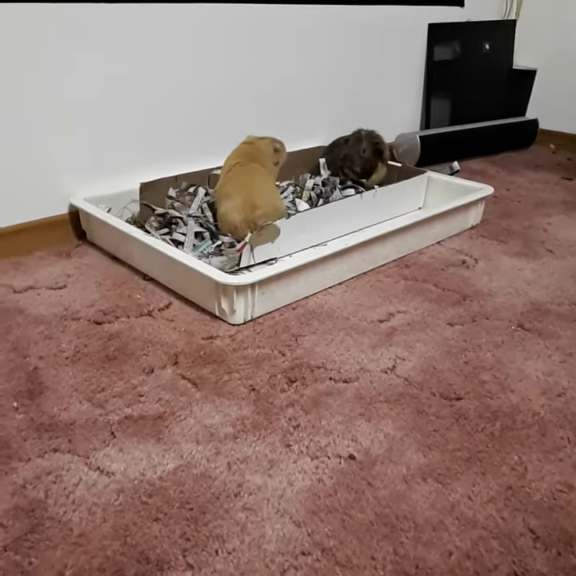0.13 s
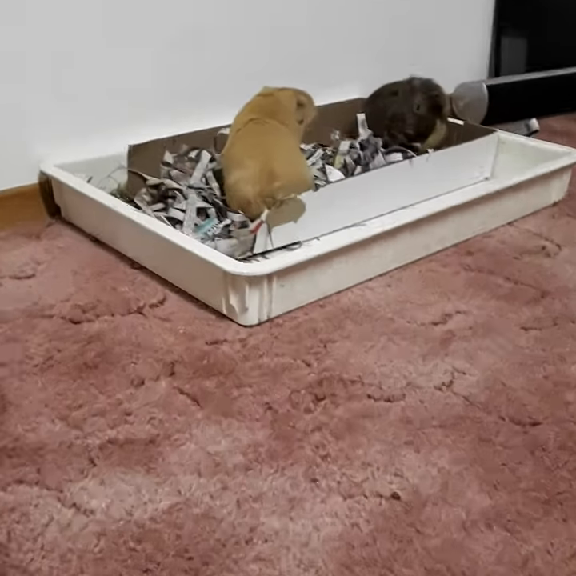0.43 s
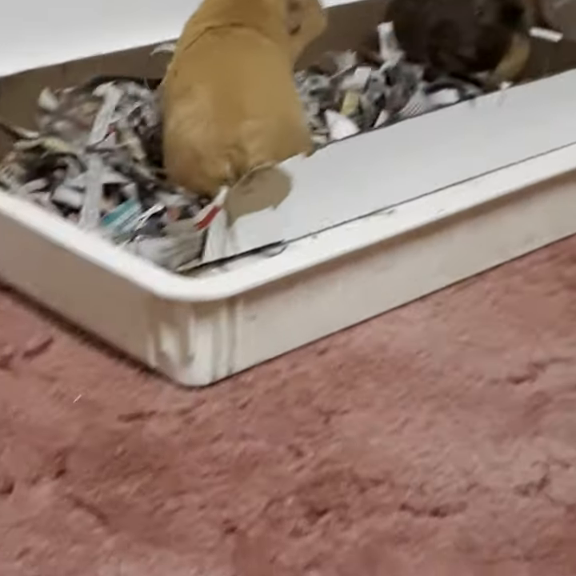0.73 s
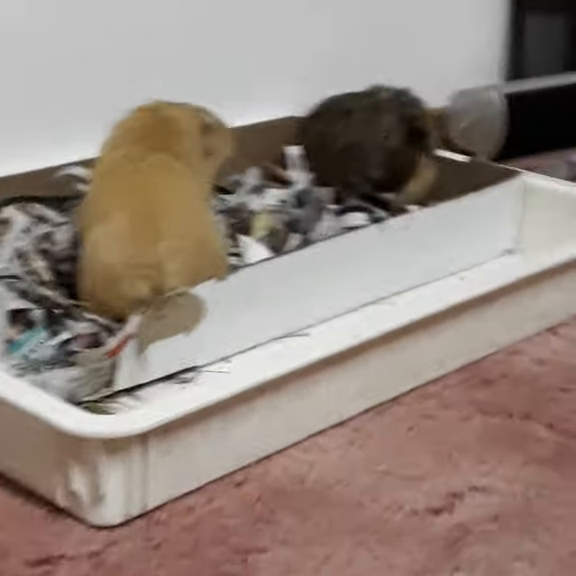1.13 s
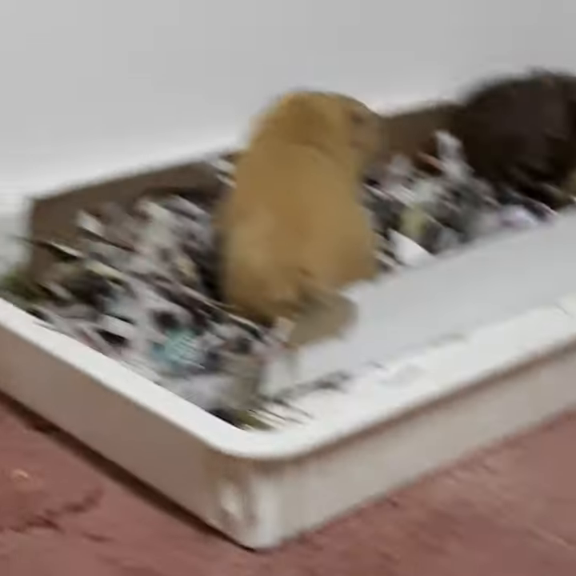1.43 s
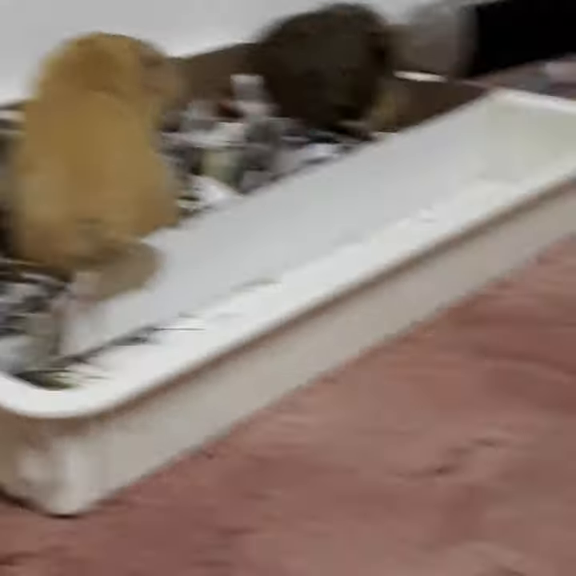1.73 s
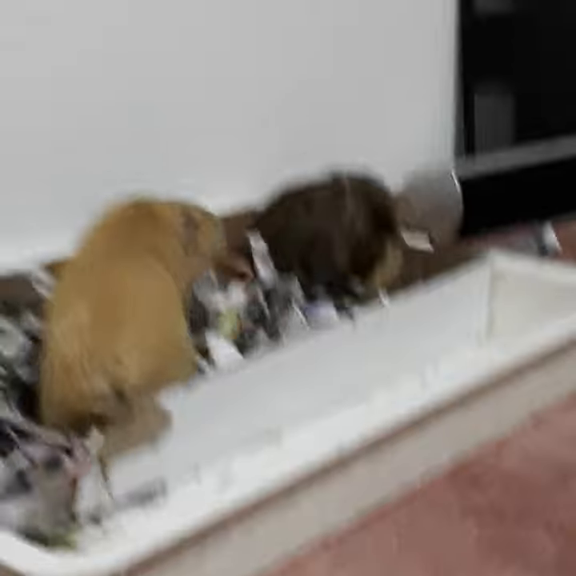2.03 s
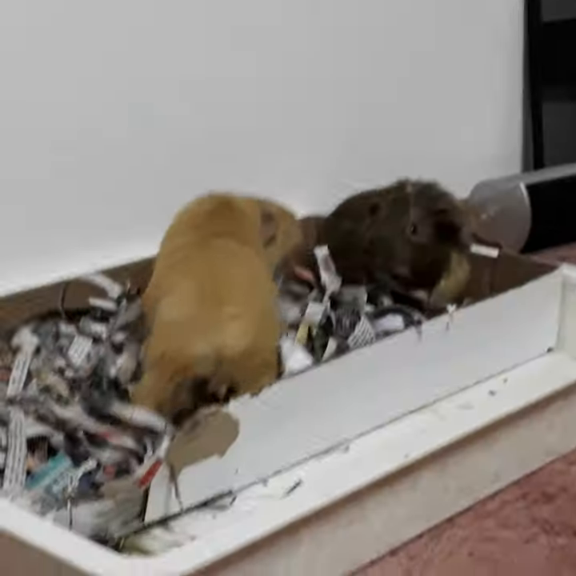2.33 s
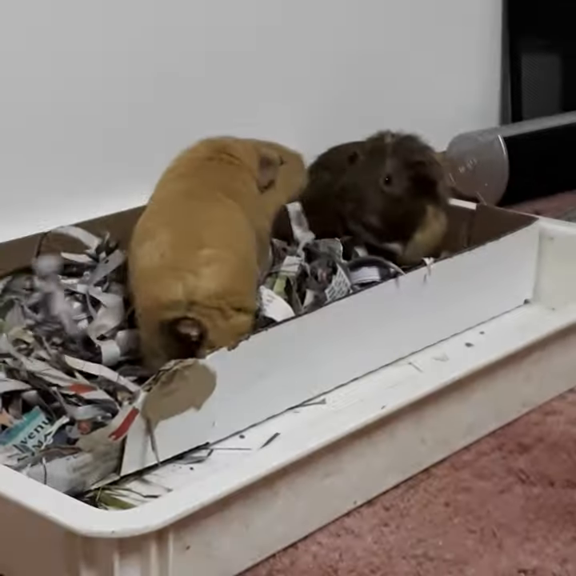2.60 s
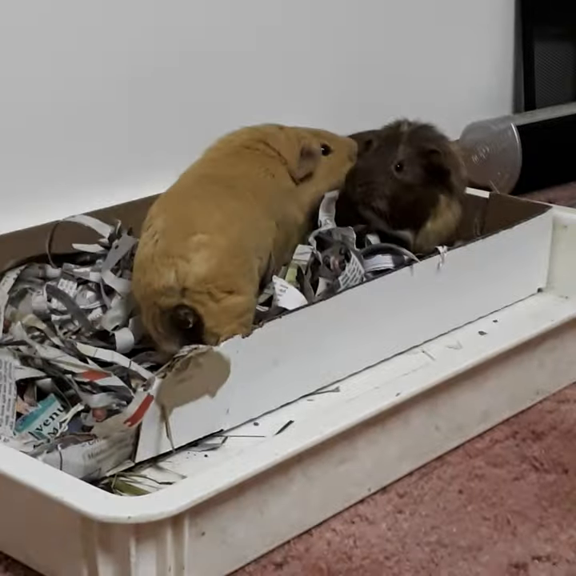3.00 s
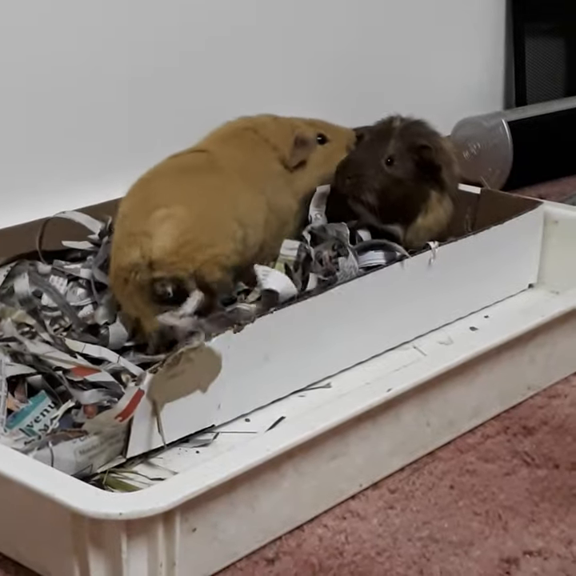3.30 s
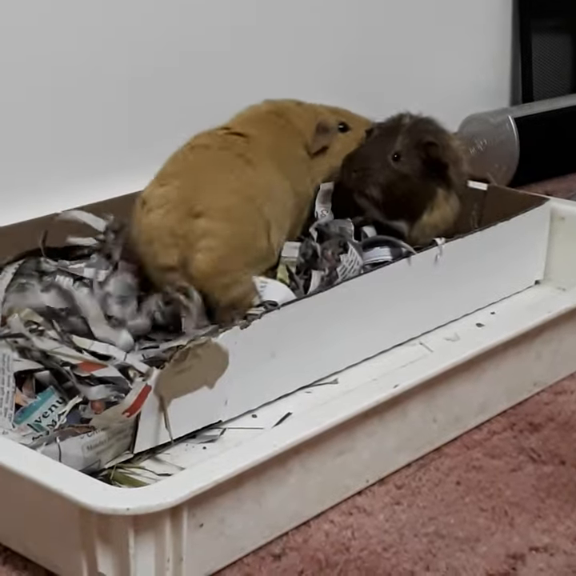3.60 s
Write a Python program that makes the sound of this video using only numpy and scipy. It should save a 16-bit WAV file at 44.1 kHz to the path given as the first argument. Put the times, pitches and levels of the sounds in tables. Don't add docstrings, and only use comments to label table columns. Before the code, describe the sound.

Guinea pig teeth clicks and low throaty chuts with brief squeaks over crackling paper litter

```python
import sys
import numpy as np
from scipy import signal
from scipy.fft import rfft, irfft, next_fast_len
from scipy.io import wavfile
from scipy.ndimage import uniform_filter1d, map_coordinates

SR = 44100
rng = np.random.default_rng(int(sys.argv[2]) if len(sys.argv) > 2 else 0)


def boost_factor(decibels):
    exponent = np.asarray(decibels, float) / 20
    return 10 ** exponent


def digitize_waveform(pressure):
    field = np.atleast_2d(pressure).T
    bounded = np.clip(field, -1, 1)
    quanta = np.round(bounded * 32767).astype(np.int16)
    wavfile.write(sys.argv[1], SR, quanta)


N = 165375


def unit(x):
    return x / np.sqrt(np.mean(x ** 2) + 1e-20)


def along(points, hz):
    f, v = np.transpose(points)
    return np.interp(np.log(hz + 1), np.log(f + 1), v)


def wobble(rate):
    knots = rng.standard_normal(int(N * rate / SR) + 4)
    return map_coordinates(knots, [np.arange(N) * rate / SR])


def jitter(t, step_s, count):
    return np.interp(t, np.arange(count) * step_s, rng.standard_normal(count))


def filtered(x, response):
    m = next_fast_len(x.shape[-1] + 4096)
    return irfft(rfft(x, m) * response(np.fft.rfftfreq(m, 1 / SR)), m)[..., :x.shape[-1]]


def peak(hz, width_hz):
    return lambda f: 1j * f * abs(width_hz) / (hz * hz - f * f + 1j * f * abs(width_hz))


def add(track, x, s):
    part = track[..., round(s * SR):][..., :x.shape[-1]]
    part += x[..., :part.shape[-1]]


# (frequency [Hz], left-right correlation [-1..1])
ALIKE = [(60, 0.84), (240, 0.84), (800, 0.8), (3770, 0.48), (15000, 0.58)]


def spread(pair):
    turn = lambda f: np.arccos(np.clip(along(ALIKE, f), -1, 1)) / 2
    mid, side = filtered(pair, lambda f: np.array([np.cos(turn(f)), np.sin(turn(f))]))
    return np.array([mid + side, mid - side])


def rush(response, patchy_db, crackle=0.):
    struck = rng.random(N) < 1500 / SR
    snap_noise = struck * boost_factor(1.2 * rng.exponential(size=N)) * rng.standard_normal((2, N))
    noise = rng.standard_normal((2, N)) + crackle * unit(snap_noise)
    z = signal.stft(noise, nperseg=512)[2]
    field = uniform_filter1d(rng.standard_normal(z.shape[1:]), size=7, axis=0)
    field = uniform_filter1d(field, size=10, axis=1)
    pair = signal.istft(z * boost_factor(patchy_db * unit(field)), nperseg=512)[1][:, :N]
    return unit(spread(filtered(pair, response)))


# (time [s], click peak [dB], grind after it [dB], ring [Hz])
TEETH = [(.018, -55, 5, 7530), (.031, -53, -14, 7400), (.0998, -46.5, 0, 7700), (.1049, -41.5, -9, 7700),
         (.123, -46.5, 0.5, 7250), (0.1834, -40, -19, 7700), (.1895, -39, -11, 8040),
         (0.2685, -38, -15, 8040), (0.2744, -35.5, -26, 7880), (.353, -48.5, -2.5, 7840),
         (.3585, -49, -10, 8200), (.385, -57, 1.5, 7600), (.435, -52.5, 0.5, 7900),
         (.4978, -49.5, -2.5, 7560), (.5377, -53, -4.5, 7800), (.6285, -55, -0.5, 7570),
         (.6629, -50.5, -11, 7500), (.7362, -54, -1, 7970), (.7427, -49.5, -5, 7260), (.828, -49, -1, 7440),
         (.8395, -48, -7, 7620), (.9308, -53.5, 1.5, 7400), (1.0395, -56, 3, 7530), (1.1488, -51, -5, 7360),
         (1.1722, -48.5, -5, 7500), (1.295, -57.5, 1, 7600), (1.3838, -49.5, -7, 7550),
         (1.502, -55, -5, 8050), (1.781, -62, 7, 7300), (1.8652, -59.5, 3, 7270), (1.9614, -55, 0.5, 7800),
         (2.0687, -54, -16, 7750), (2.145, -54, -5, 7100), (2.2662, -53, -13, 7700),
         (2.366, -47, -18.5, 7660), (2.3989, -60, -10, 7200), (2.603, -47.5, -4.5, 7300),
         (3.1053, -56, -5, 7300), (3.2211, -52, -4, 7560), (3.275, -55, 1, 7600), (3.665, -50, -9, 7600)]


def teeth():
    rise_s, grind_t60_s, sag = 0.00075, 0.15, .06
    out, t = np.zeros(N), np.arange(SR // 10) / SR

    def scrape(hz):
        color = lambda f: peak(hz, 1500)(f) ** 2 + 0.089 * peak(12500, 7000)(f)
        return unit(filtered(rng.standard_normal(len(t)), color))

    for s, db, grind_db, hz in TEETH:
        fizz = unit(filtered(rng.standard_normal(len(t)), peak(10300, 7000)))
        burst = t / rise_s * np.exp(1 - t / rise_s)
        click = (np.sin(2 * np.pi * hz * t) + 0.62 * fizz) * burst
        grit = boost_factor(1.5 * jitter(t, 0.002, 60))
        early, late = scrape(hz), scrape(hz * (1 - sag))
        turn = np.clip(t / 0.022, 0, 1) * np.pi / 2
        grind = grit * (np.cos(turn) * early + np.sin(turn) * late) * np.clip(t / 0.009, 0, 1)
        add(out, boost_factor(db - 4) * (click + boost_factor(grind_db - 60 * t / grind_t60_s) * grind), s)
    return out


# (time [s], peak level [dB], throat resonance [Hz])
CHUTS = [(0.457, -52, 525), (0.497, -52.5, 745), (0.634, -59, 690), (0.732, -52, 646), (0.828, -49, 610),
         (0.93, -52, 700), (1.039, -55, 744), (1.155, -53.5, 930), (1.262, -55.5, 730), (1.328, -60, 720),
         (1.382, -56.5, 590), (1.5, -57.5, 740), (1.19, -63, 900), (2.875, -63, 830), (1.9, -53, 560),
         (1.961, -49.5, 830), (.03, -58.5, 686), (.105, -57, 785), (.19, -60, 764), (2.02, -52, 840),
         (2.068, -52, 814), (2.146, -47, 676), (2.267, -50, 814), (2.365, -44, 526), (2.4, -50.5, 525),
         (2.483, -54, 600), (2.515, -56, 754), (2.6, -65, 750), (2.646, -51, 770), (2.975, -55, 600),
         (2.995, -53.5, 920), (3.1, -56, 690), (3.216, -51, 745), (3.323, -51, 1010), (3.431, -54, 760),
         (3.536, -54.5, 720), (3.659, -47.5, 675)]


def chuts():
    out, t = np.zeros(N), np.arange(SR // 10) / SR
    for s, db, hz in CHUTS:
        shape = np.clip(t / 0.0043, 0, 1) * boost_factor(-60 * np.clip(t - .02, 0, 1) / 0.083)
        pulse_hz = np.repeat(90 * boost_factor(2.5 * rng.standard_normal(21)), SR // 200)[:len(t)]
        cycle = np.cumsum(pulse_hz) / SR
        breath = rng.standard_normal(len(t)) * np.exp(-2.5 * (cycle % 1))
        color = lambda f: (peak(hz, 450)(f) ** 2 + .5 * peak(520, 300)(f) ** 2
                           - 0.32 * peak(1200, 500)(f) ** 2)
        throat = unit(filtered(breath, color))
        add(out, boost_factor(db - 20) * unit(shape * throat), s - .003)
    return out


# (time [s], length [s], pitch [Hz], rise at the end [share of pitch], level [dB])
SQUEAKS = [
    (0.661, 0.027, 407, 0.067, -63),
    (1.652, 0.0594, 811, 0.46, -60),
    (1.736, 0.041, 860, 0.5, -50),
    (1.823, 0.033, 964, 0.31, -48.5),
    (1.886, 0.042, 872, 0.04, -55.5),
    (2.178, 0.063, 717, 0.85, -56),
    (2.362, 0.02, 507, 0.077, -47.5),
    (2.535, 0.052, 750, 0.049, -53.5),
    (3.24, 0.079, 908, -0.35, -60.5),
]


def squeaks():
    out = np.zeros(N)
    for s, length, hz, rise, db in SQUEAKS:
        u = np.arange(round(length * SR)) / (length * SR)
        slow = lambda: jitter(u * length, 0.00473, 30)
        phase = 2 * np.pi * np.cumsum(hz * (1 + rise * u ** 5 + .02 * slow())) / SR
        shape = np.clip(u / 0.21, 0, 1) * np.clip((1 - u) / 0.3, 0, 1) * boost_factor(2 * slow())
        note = np.sin(phase) + boost_factor(-22) * np.sin(2 * phase)
        add(out, boost_factor(db - 3.5) * shape * note, s)
    return out


# (frequency [Hz], density [dB per Hz])
PAPER = [(530, -5), (900, -4.5), (2600, -4.5), (3860, -1.5), (6410, 0.5), (7680, -0.5), (8660, -9.5),
         (16000, -3)]


def paper_color(f):
    return boost_factor(along(PAPER, f))


def strokes(rows, edge, rough_db, width, hiss):
    out = np.zeros((2, N))
    for s, length, hz, db in rows:
        u = np.arange(round(length * 2.6 * SR)) / (length * SR)
        shape = np.clip(u / edge, 0, 1) * np.clip((1.5 - u) / 0.62, 0, 1)
        grain = boost_factor(rough_db * jitter(u * length, 0.0017, 100))
        noise = rng.standard_normal((2, SR // 2))[:, :len(u)] * grain
        width_hz = width * hz * min(hz / 4500, 1)
        rub = filtered(noise, lambda f: peak(hz, width_hz)(f) ** 2 + hiss * paper_color(f))
        add(out, boost_factor(db) * shape * unit(rub), s)
    return out


# (time [s], level [dB])
STIR = [(0, -70), (.3, -68), (.6, -72), (.7, -66.5), (.98, -71), (1.1, -68), (1.4, -65), (1.68, -72.5),
        (1.8, -68), (2.0, -66), (2.622, -61), (2.72, -70.5), (2.79, -69.5), (3.15, -71.5), (3.24, -65),
        (3.4, -68), (3.58, -57.5), (3.75, -60)]
# (time [s], length [s], resonance [Hz],
# level [dB])
SLIDES = [(.19, 0.046, 3900, -63.5), (.21, 0.061, 1775, -62), (.38, 0.069, 1730, -64.5),
          (.41, 0.079, 2940, -62), (.6, 0.049, 2020, -74), (.71, 0.068, 3050, -68),
          (.52, 0.039, 3970, -67.5), (1.05, 0.056, 4900, -64), (1.06, 0.058, 3880, -62.5),
          (1.115, 0.074, 4110, -61), (1.17, 0.14, 6400, -65), (1.22, 0.16, 3350, -74.5),
          (1.36, 0.038, 4130, -64.5), (1.76, 0.073, 4750, -65), (1.825, 0.048, 4330, -58),
          (1.87, 0.049, 4300, -65), (2.07, 0.041, 5340, -63), (1.96, 0.045, 2840, -67.5),
          (2.1, .05, 3740, -63), (2.16, 0.047, 3840, -62), (2.33, 0.046, 4400, -67),
          (2.17, 0.068, 1630, -62), (2.22, 0.096, 2640, -63), (2.44, 0.041, 4500, -59.5),
          (2.44, 0.045, 1780, -65), (2.59, 0.058, 2310, -59.5), (2.63, 0.038, 1780, -63),
          (2.6, 0.092, 6000, -68), (2.915, 0.014, 1920, -68), (3.04, 0.071, 6800, -71),
          (3.19, .05, 5640, -67), (2.91, 0.053, 3500, -69), (2.76, 0.054, 12700, -69.5),
          (3.2, 0.045, 12100, -70.5), (3.51, 0.17, 12200, -64.5), (3.27, 0.04, 4970, -59.5),
          (3.32, .05, 4800, -63.5), (3.42, 0.04, 2580, -61), (3.43, 0.034, 4640, -65),
          (3.51, 0.04, 4700, -66), (3.58, 0.049, 4100, -58), (3.58, 0.11, 2380, -62.5),
          (3.6, 0.12, 1490, -63), (1.97, 0.036, 12000, -67), (3.655, 0.035, 3900, -57),
          (3.685, 0.04, 3390, -55.5)]


def litter():
    s, db = np.transpose(STIR)
    stir_db = np.interp(np.arange(N) / SR, s, db) + wobble(9.04) + 1.44 * wobble(25.12)
    bed = boost_factor(stir_db + 5) * rush(paper_color, patchy_db=2.3, crackle=.5)
    return bed + spread(strokes(SLIDES, edge=0.21, rough_db=2.5, width=.26, hiss=.22))


# (time [s], peak level [dB])
SNAPS = [
    (2.4474, -46),
    (3.4452, -43.5),
    (3.5245, -43),
    (3.5642, -53),
    (3.5962, -36.5),
    (3.618, -47),
    (3.642, -48),
]


def snaps():
    out, t = np.zeros(N), np.arange(SR // 20) / SR
    for s, db in SNAPS:
        crack = unit(filtered(rng.standard_normal(len(t)), paper_color))
        fade = boost_factor(-60 * t / 0.0035) + 0.48 * boost_factor(-60 * t / 0.14)
        add(out, boost_factor(db - 9.5) * crack * fade, s)
    return out


# (time [s], peak level [dB], pitch [Hz])
THUMPS = [
    (1.765, -44.5, 169),
    (2.019, -49, 203),
    (2.598, -54, 119),
    (2.8, -60, 110),
    (3.441, -52, 120),
    (0.431, -53, 170),
    (3.219, -58, 234),
    (3.596, -64, 102),
    (3.74, -45, 129),
]


def thumps():
    out, t = np.zeros(N), np.arange(SR // 8) / SR
    for s, db, hz in THUMPS:
        push = unit(filtered(rng.standard_normal(len(t)), lambda f: peak(hz, 250)(f) ** 2))
        add(out, boost_factor(db - 10.5) * push * t / 0.032 * np.exp(1 - t / 0.014), s - .01)
    return out


# (time [s], length [s], resonance [Hz], level [dB])
SLEEVE = [
    (1.15, 0.18, 11800, -57),
]


def sleeve():
    return strokes(SLEEVE, edge=0.23, rough_db=1.5, width=1.0, hiss=0) * boost_factor([[-7], [1.5]])


# (frequency [Hz], t60 [s])
WALLS = [(200, 0.18), (2000, 0.094), (10000, 0.16)]


def walls(x):
    hz, t, z = signal.stft(rng.standard_normal((2, SR // 3)), SR, nperseg=256)
    tail = signal.istft(z * boost_factor(-60 * t / along(WALLS, hz)[:, None]), SR, nperseg=256)[1]
    late = np.pad(x, (300, 0))[None]
    return signal.fftconvolve(late, tail / np.linalg.norm(tail[0]), axes=1)[:, :N]


# (frequency [Hz], density [dB per Hz])
ROOM_TONE = [(18, -43), (36, -10.5), (156, -2), (261, -16), (710, -3.5), (794, -12.5), (2500, -21.5),
             (3250, -42), (5500, -120)]
# (frequency [Hz], width [Hz], level [dB])
HUM = [(60, 53, -5), (158.6, 52.5, -0.5)]


def room_tone():
    air_db, hum_db = -72.5, -71.5

    def drone(f):
        return sum(boost_factor(db) * peak(hz, w)(f) * (-1) ** k for k, (hz, w, db) in enumerate(HUM))

    air = boost_factor(air_db) * rush(lambda f: boost_factor(along(ROOM_TONE, f)), patchy_db=2.0)
    return air + boost_factor(hum_db + 0.68 * wobble(17)) * rush(drone, patchy_db=2.0)


def scene():
    voice, clicks = chuts() + squeaks(), teeth()
    near = voice + 0.67 * clicks + snaps() + thumps()
    voice_echo = walls(voice) + walls(voice).mean(axis=0)
    echoes = boost_factor(-4) * voice_echo + boost_factor(-5) * walls(clicks)
    return near + echoes + litter() + sleeve() + room_tone()


def top_cut(x):
    return signal.sosfilt(signal.butter(12, 15790, fs=SR, output="sos"), x)


# (frequency [Hz], left over right [dB])
LEAN = [(60, 1), (240, -0.5), (950, 0.5), (3770, 1.5), (15000, 4.5)]


def record(dry):
    port_hz, port_width_hz, port_db, top_hz = 7620, 1600, 4, 15790
    lean = lambda f: boost_factor(np.array([[.5], [-.5]]) * along(LEAN, f))
    port = lambda f: 1 + (boost_factor(port_db) - 1) * peak(port_hz, port_width_hz)(f) ** 2
    mix = filtered(dry, lambda f: lean(f) * port(f) * (f < top_hz))
    return top_cut(mix)


dry = scene()
out = record(dry)
digitize_waveform(out)
```